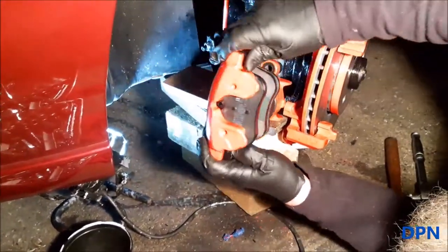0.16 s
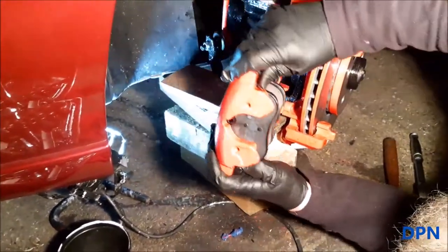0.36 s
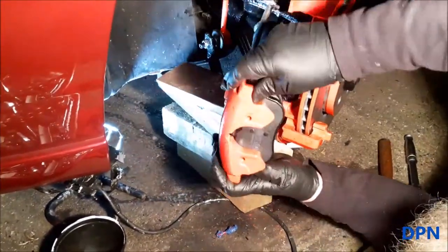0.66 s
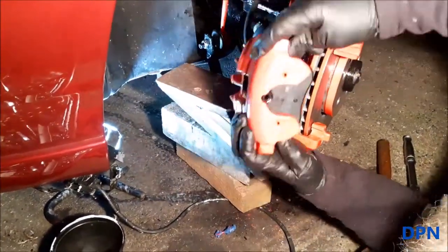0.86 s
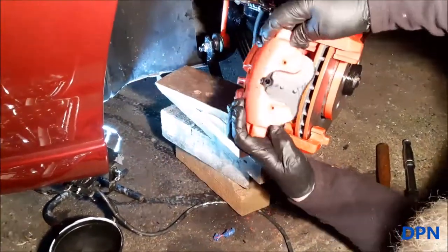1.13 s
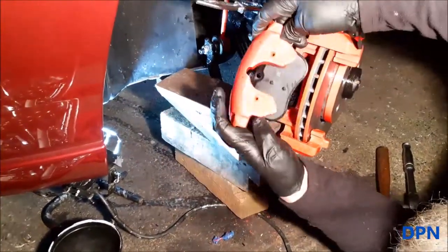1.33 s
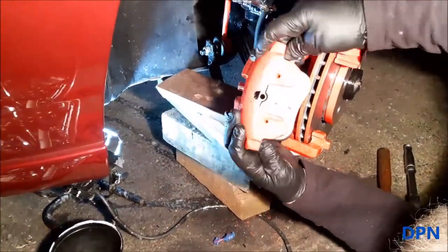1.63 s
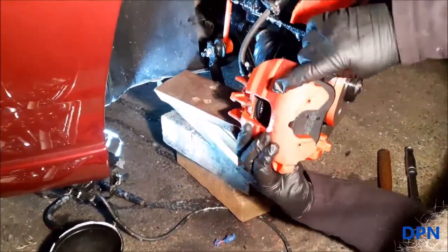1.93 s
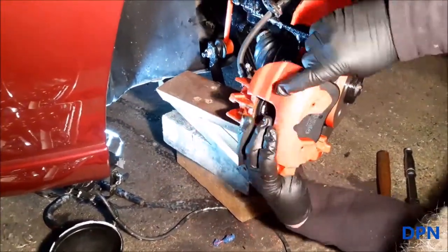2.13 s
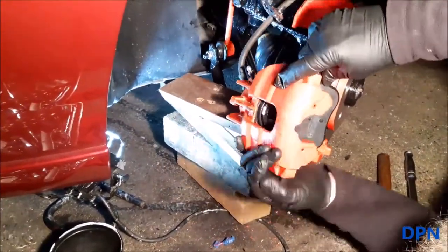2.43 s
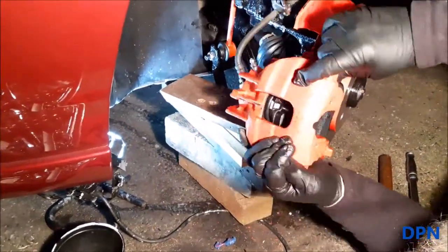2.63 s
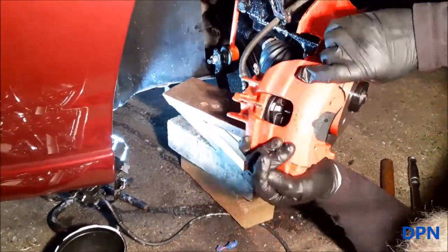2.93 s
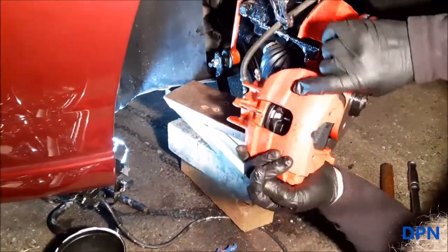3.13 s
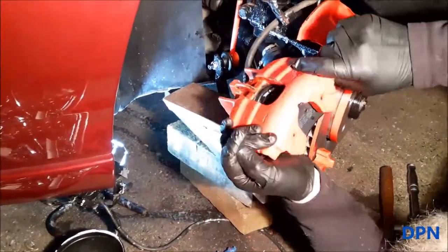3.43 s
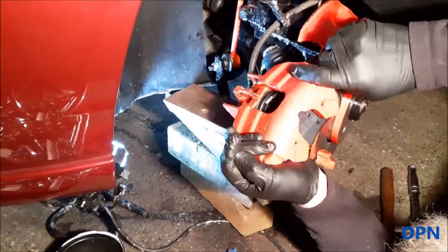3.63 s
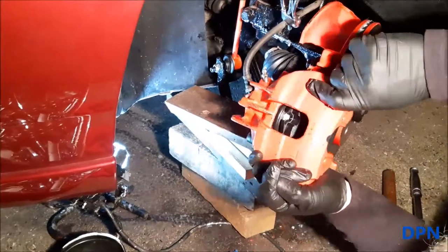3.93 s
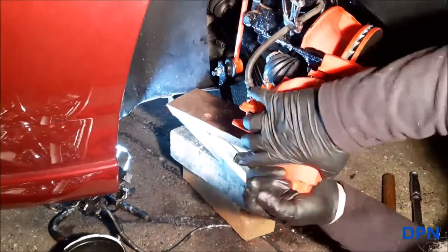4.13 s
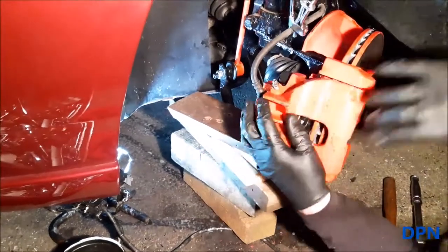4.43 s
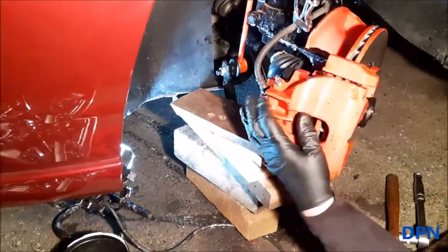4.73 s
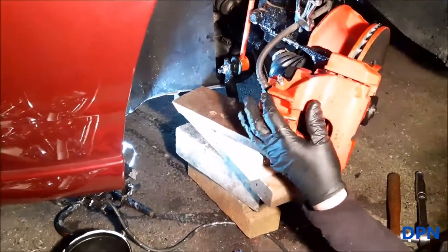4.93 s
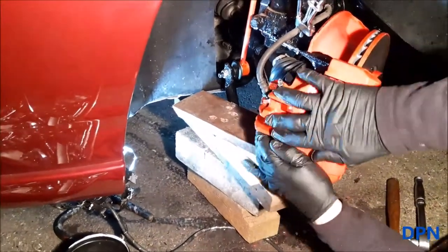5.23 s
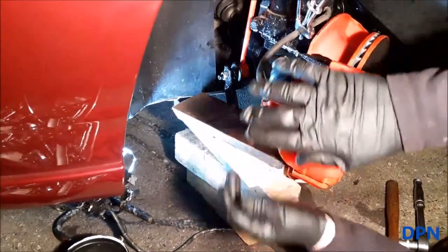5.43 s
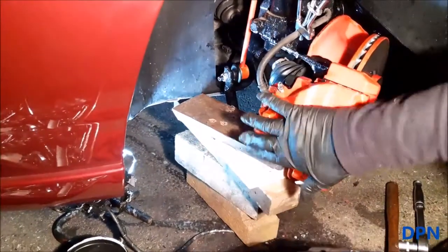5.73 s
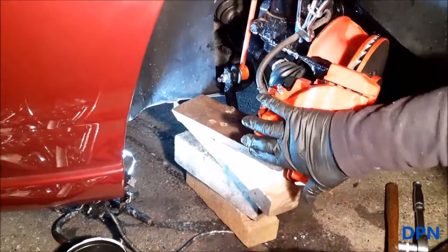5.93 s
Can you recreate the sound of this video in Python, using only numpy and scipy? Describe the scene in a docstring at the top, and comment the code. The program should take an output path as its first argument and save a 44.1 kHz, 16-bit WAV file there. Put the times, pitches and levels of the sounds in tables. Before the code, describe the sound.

In a quiet garage, gloved hands fit a brake caliper over a disc, heard close and in stereo. After a low, unsteady hum come speeded-up small ticks, a cluster of metal clacks around one second, scrapes and hollow knocks near one and a half, then sparse faint taps. Pads squeak softly past three seconds, two sharp clanks hit after four, rubs and clicks follow, and a heavier palm blow lands near the end.

```python
"""Metal parts of a brake caliper tick, knock and ring under gloved hands: noise bursts excite resonances.
Pads scrape on the disc as shaped friction noise, with squeaks and whistles as gliding tones and bands.
The hollow wheel arch hums low. The middle stretch is sped up, so its boom sits two octaves higher and its
echoes are short; a palm blow at normal speed follows, near the end. Quiet garage air lies beneath."""
import sys
import numpy as np
from scipy import signal
from scipy.io import wavfile
from scipy.ndimage import uniform_filter1d

SR = 44100
rng = np.random.default_rng(int(sys.argv[2]) if len(sys.argv) > 2 else 0)


def to_wav(sig):
    """Store sig (one row per channel, or 1-D mono) as 16-bit WAV at the path in sys.argv[1].

    Samples outside -1..1 are clipped; the rate is SR.
    """
    pcm = np.clip(np.atleast_2d(sig), -1, 1) * 32767
    pcm = np.round(pcm).astype(np.int16)
    wavfile.write(sys.argv[1], SR, pcm.T)  # frames by channels


N = 268111

# Spectrum of thud and boom, sped up. Each row: frequency in hertz, relative density in dB.
THUD = [(35, -80), (60, -45.5), (107, -46), (181, -13), (350, -7.5), (440, -6.5), (584, -7), (651, -9),
        (1190, -7.5), (1500, -16.5), (1950, -56.5), (3300, -120)]
# Spectrum of the body of the parts and of coarse scrape. Each row: frequency in hertz, relative density in dB.
BODY = [(150, -79.5), (500, -30.5), (900, -0.5), (1300, -1), (2200, 3.5), (3500, 3), (5000, -10.5),
        (8000, -41.5)]
# Spectrum of sharp edges and of fine hiss. Each row: frequency in hertz, relative density in dB.
EDGE = [(800, -74.5), (3000, -12), (4800, -2.5), (7000, 0), (10000, -5), (13000, -9), (16000, -6)]
# Left-right likeness of diffuse sound. Each row: frequency in hertz, likeness (1 is identical).
SAME = [(60, 0.87), (500, 0.84), (1500, 0.81), (3100, 0.15), (7000, 0)]


def gain_of(db):
    """Level law: decibels to amplitude."""
    return 10 ** (np.asarray(db) / 20)


def evened(x):
    """Power normalisation: scales to rms 1."""
    return x / np.sqrt(np.mean(x ** 2) + 1e-20)


def read(points, hz):
    """Interpolates a spectrum table linearly over log frequency."""
    f, value = np.transpose(points)
    return np.interp(np.log(hz + 1), np.log(f + 1), value)


def colour(points, peaks=()):
    """Minimum-phase filter of energy 1: the phase is the Hilbert transform of the log gain."""
    hz = abs(np.fft.fftfreq(8192, 1 / SR))
    gain = gain_of(read(points, hz))
    for f, width, db in peaks:
        resonance = 1 / (1 + (2 * (hz - f) / width) ** 2) ** 2
        gain = gain * (1 + gain_of(db) * resonance)
    log_gain = np.log(np.maximum(gain, 1e-5))
    phase = -signal.hilbert(log_gain).imag
    taps = np.fft.ifft(np.exp(log_gain + 1j * phase)).real[:4096]
    return taps / np.linalg.norm(taps)


def through(x, taps):
    """Linear filtering: convolves every channel with the taps."""
    return signal.oaconvolve(np.atleast_2d(x), np.atleast_2d(taps), axes=1)[:, :N]


def spread(left, other):
    """Partial coherence: makes a left-right pair of spectra as alike as the diffuse-field table asks."""
    hz = np.linspace(0, SR / 2, left.shape[0])
    same = np.clip(read(SAME, hz), -1, 1)[:, None]
    return np.array([left, same * left + np.sqrt(1 - same ** 2) * other])


def hiss(points, patchy_db, peaks=(), size=8):
    """Coloured Gaussian noise in two channels, its level drifting in time-frequency patches; rms 1."""
    frames = N // 128 + 5
    a, b, c, d, patches = rng.standard_normal((frames, 257, 5)).T
    patches = evened(uniform_filter1d(uniform_filter1d(patches, size, 0), size, 1))
    z = spread(a + 1j * b, c + 1j * d) * gain_of(patchy_db * patches)
    noise = signal.istft(z, nperseg=512, noverlap=384)[1][:, :N]
    return evened(through(noise, colour(points, peaks)))


def wobble(size, span):
    """Narrow-band random modulation: a smoothed complex noise of rms 1 roughens level and phase."""
    noise = rng.standard_normal((2, size))
    a, b = uniform_filter1d(uniform_filter1d(noise, span, mode="wrap"), span, mode="wrap")
    return (a + 1j * b) * np.sqrt(3 * span / 4)


def spin(hz, t):
    """Complex rotation at a steady frequency, the phasor of a pure tone."""
    return np.exp(2j * np.pi * hz * t)


def glide(path_hz):
    """Complex rotation whose phase is the running sum of its frequency."""
    return np.exp(2j * np.pi * np.cumsum(path_hz) / SR)


def tail(speed, start_s):
    """Reverberation: echoes of random sign decay per band; speed shortens them and shifts the bands."""
    # Decay of the garage at speed 1. Each row: frequency in hertz, time to fall 60 dB in seconds.
    garage = [(100, 0.34), (260, 0.23), (700, 0.22), (1840, 0.047), (4850, 0.04), (12800, 0.19)]
    size, first = SR // 2, round(start_s * SR)
    taps, slots = np.zeros((2, size)), np.arange(first, size - 16, 16)  # one echo per 16 samples
    places = slots + rng.integers(0, 16, (2, len(slots)))
    signs = rng.choice([-1., 1.], (2, len(slots)))
    np.put_along_axis(taps, places, signs, 1)
    hz, t, z = signal.stft(taps, SR, nperseg=256)
    decay = gain_of(-60 * speed * t / read(garage, hz / speed)[:, None])
    taps = signal.istft(spread(z[0], z[1]) * decay, SR, nperseg=256)[1]
    return taps / np.linalg.norm(taps[0])


def panels(x):
    """Early reflections: nearby panels comb-filter left and right differently."""
    taps = np.zeros((2, 64))
    taps[0, [1, 9, 31]] = 1, .35, -.25
    taps[1, [0, 14, 22]] = 1, -.25, .3
    return through(x, taps / np.linalg.norm(taps, axis=1, keepdims=True))


def burst(t60, rise_s, apart=0.):
    """Contact chatter: noise with a quick rise and exponential decay, partly different left and right."""
    t = np.arange(round(.2 * SR)) / SR
    shared, *own = rng.standard_normal((3, len(t)))
    noise = (shared + apart * np.array(own)) / np.sqrt(1 + apart ** 2)
    return noise * gain_of(-60 * t / max(t60, .004)) * (1 - np.exp(-t / rise_s))


def add(mix, s, sound):
    """Superposition: mixes a sound in at time s."""
    part = mix[..., round(s * SR):][..., :sound.shape[-1]]
    part += sound[..., :part.shape[-1]]


def air():
    """Background noise of garage air: coloured noise crossfades to a higher spectrum in the fast stretch."""
    # Air at normal speed, then sped up. Each row: frequency in hertz, relative density in dB.
    air_slow, air_fast = [(88, -55), (150, -8), (376, -11.5), (854, -18), (923, -18), (998, -20.5),
                          (1360, -18), (2400, -23), (6770, -27), (8560, -33.5), (12400, -28),
                          (16000, -29.5)], [(35, -56.5), (60, -28), (130, -24), (176, -8), (268, 0), (389, 0),
                                       (698, -18.5), (1170, -14.5), (1740, -21), (5460, -22), (6740, -28),
                                       (8510, -23.5), (16000, -36)]
    # Level at normal speed, lifted by fading echoes of earlier knocks. Each row: time in seconds, level in dB.
    air_level = [(0, -58.5), (.15, -68.5), (.4, -58), (5.4, -79.5), (5.74, -73), (5.9, -56.5), (6.08, -62)]
    fast_from_s, fast_to_s, fast_db = .422, 5.372, -68.5
    t = np.arange(N) / SR
    is_fast = uniform_filter1d(1. * (t > fast_from_s) * (t < fast_to_s), 400)
    slow = gain_of(np.interp(t, *np.transpose(air_level))) * hiss(air_slow, 1.8)
    fast = gain_of(fast_db) * gain_of([[-.6], [.6]]) * hiss(air_fast, 1.2)
    return is_fast * fast + (1 - is_fast) * slow


def arch():
    """Cavity resonance of the hollow wheel arch: a wavering low tone within a band of rumble."""
    # Hum in two parts, before and after the fast stretch.
    # Each row: time in seconds, level in dB, frequency in hertz.
    hum_parts = [
        [(0.0, -42, 100.3), (0.052, -39, 100.5), (0.088, -43, 104.8), (0.112, -40.5, 104), (0.142, -61, 105),
         (0.17, -49.5, 103), (0.198, -55, 105), (0.248, -65, 101), (0.304, -49.5, 110), (0.35, -42.5, 109),
         (0.372, -42.5, 107), (0.41, -54, 105), (0.42, -78, 106)],
        [(5.36, -76, 90), (5.67, -66, 61.8), (5.745, -74, 66.1), (5.775, -40, 123), (5.796, -26, 116),
         (5.81, -27, 113), (5.828, -36.5, 112), (5.856, -34, 112), (5.878, -49, 114.5), (5.9, -35.5, 119.2),
         (5.944, -34.5, 104), (5.984, -52.5, 93.4), (6.08, -51, 94.7)],
    ]
    # Spectrum of the rumble. Each row: frequency in hertz, relative density in dB.
    rumble_tone = [(15, -78.5), (25, -37), (59, -14.5), (102, -7), (147, -13.5), (178, -13.5), (413, -23.5),
                   (549, -22), (677, -37), (775, -34), (900, -35.5), (1170, -77)]
    waver, rumble_db = .27, -7  # unsteadiness of the hum; rumble relative to the hum
    t, level, hum = np.arange(N) / SR, np.zeros(N), np.zeros(N)
    for rows in hum_parts:
        s, db, hz = np.transpose(rows)
        part = uniform_filter1d(gain_of(np.interp(t, s, db, -120, -120)), 200)
        turn = glide(np.interp(t, s, hz)) * np.exp(2j * np.pi * rng.random())
        level = level + part
        hum = hum + np.sqrt(2) * part * (turn * (1 + waver * wobble(N, 700))).real
    return hum + gain_of(rumble_db) * level * hiss(rumble_tone, 2.4)


def whistles():
    """Narrow-band friction noise: random modulation widens a gliding tone as pads whistle on the steel."""
    # Each row: start and end in seconds, start and end frequency in hertz, level in dB.
    # A row that ends before it starts is silent.
    whistle_rows = [(3.274, 3.335, 1150, 1150, -54), (4.85, 4.96, 3700, 3900, -63),
                    (4.85, 4.95, 2450, 2900, -57), (3.26, 3.338, 8600, 8300, -53.5),
                    (3.35, 3.47, 7100, 7530, -50), (3.324, 3.46, 5500, 5900, -65),
                    (2.934, 3.005, 5500, 5500, -72), (3.082, 2.9, 2257, 2195, -67),
                    (3.1, 3.19, 5650, 5400, -70.5), (3.658, 3.76, 2000, 2500, -66),
                    (3.899, 4.017, 2900, 3500, -57), (3.609, 3.806, 5720, 5610, -64.5),
                    (3.92, 4.082, 7400, 7300, -55), (4.397, 4.54, 7470, 7200, -46),
                    (4.703, 4.781, 9600, 9300, -51.5), (4.72, 4.782, 7240, 6908, -61),
                    (4.853, 5.01, 7140, 7500, -51), (5.25, 5.31, 7320, 7000, -46.5)]
    out = np.zeros(N)
    for start_s, end_s, start_hz, end_hz, db in whistle_rows:
        u = np.arange(0, 1, 1 / (SR * (end_s - start_s)))
        turn = glide(start_hz + (end_hz - start_hz) * u)
        envelope = np.sin(np.pi * u ** 0.94) ** 0.56
        add(out, start_s, gain_of(db) * envelope * (turn * wobble(len(u), 55)).real)
    return panels(out)


def squeaks():
    """Friction tones as the pads catch on the disc: slightly rough oscillations that fall in pitch."""
    # Each row: start and end in seconds, start and end frequency in hertz, level in dB.
    squeak_rows = [(3.436, 3.449, 2330, 1910, -44), (3.447, 3.465, 1296, 1290, -43.5),
                   (3.443, 3.482, 734, 620, -46.5), (3.49, 3.533, 566, 392, -37),
                   (3.496, 3.54, 1260, 1156, -51.5)]
    out = np.zeros(N)
    for start_s, end_s, start_hz, end_hz, db in squeak_rows:
        u = np.arange(0, 1, 1 / (SR * (end_s - start_s)))
        turn = glide(end_hz + (start_hz - end_hz) * (1 - u) ** 2)
        envelope = np.sin(np.pi * u ** 0.74)
        add(out, start_s, gain_of(db) * envelope * (turn * (1 + 0.38 * wobble(len(u), 150))).real)
    return panels(out)


def slips():
    """Irregular friction: slow uneven slips plus decaying ticks of grit caught under the pads."""
    grains_per_s, grain_spread_db, grain_db, grain_decay_s = 350, 3.5, -9, 0.0033
    uneven = evened(gain_of(1.8 * evened(uniform_filter1d(rng.standard_normal(N), 150))))
    strengths = gain_of(grain_spread_db * np.minimum(rng.exponential(1, N), 2.5))
    ticks = strengths * (rng.random(N) < grains_per_s / SR)
    grains = evened(signal.lfilter([1], [1, -np.exp(-1 / (grain_decay_s * SR))], ticks))
    return evened(uneven + gain_of(grain_db) * grains)


def sliding():
    """Friction noise: hiss and scrape follow the stroke and partly excite the steel; the arch booms along."""
    # Strokes of pads and gloves. Each row: start, fastest moment and end in seconds (put in order below),
    # levels of fine hiss, coarse scrape and boom in dB, share of power in singing steel (0-1).
    strokes = [(0.322, 0.334, 0.54, -85, -56.5, -44.5, 0.4), (0.363, 0.456, 0.5, -57, -54.5, -62, 0.1),
               (0.843, 0.921, 0.97, -69, -65, -66.5, 0.23), (1.11, 1.154, 1.17, -82, -63, -52, 0.2),
               (1.17, 1.259, 1.46, -66, -52, -39, 0.37), (1.24, 1.374, 1.444, -56, -47.5, -37.5, 0.16),
               (1.385, 1.452, 1.543, -48, -40.5, -26.5, 0.37), (1.989, 2.01, 2.025, -62, -56.5, -60, 0.15),
               (2.35, 2.38, 2.45, -70, -61, -60, .1), (2.484, 2.522, 2.525, -56.5, -62.5, -72, 0.12),
               (2.617, 2.636, 2.623, -60, -51.5, -60, 0.04), (2.923, 2.966, 2.98, -64, -71.5, -68, 0.57),
               (3.086, 3.139, 3.22, -70.5, -63, -90, 0.75), (3.265, 3.304, 3.37, -53.5, -49.5, -55, 0),
               (3.3, 3.439, 3.55, -49.5, -52.5, -67, 0.71), (3.438, 3.514, 3.526, -53.5, -56, -48.5, 0.1),
               (3.62, 3.626, 3.73, -64.5, -63, -61, 1), (3.653, 3.714, 3.85, -62, -58.5, -77, .7),
               (3.78, 3.884, 3.94, -65.5, -66.5, -75, 0), (3.901, 3.978, 3.99, -50.5, -52, -54.5, 0.23),
               (3.977, 4.065, 4.14, -53, -62, -76, 0), (4.318, 4.334, 4.384, -44, -36, -40, 0.2),
               (4.382, 4.419, 4.565, -39, -43.5, -51.5, 0.05), (4.495, 4.544, 4.58, -60, -62, -67, 0),
               (4.596, 4.609, 4.68, -57.5, -56.5, -60.5, 0.04),
               (4.674, 4.733, 4.83, -47.5, -52, -56.5, 0.02), (4.802, 4.813, 4.84, -49.5, -51, -51.5, 0.4),
               (4.83, 4.878, 5.11, -47.5, -54, -62.5, 0.15), (5.022, 5.026, 5.2, -54.5, -58.5, -64, 0),
               (5.1, 5.14, 5.26, -60.5, -61, -58.5, 0.13), (5.173, 5.217, 5.225, -55, -45.5, -43.5, 0.26),
               (5.243, 5.277, 5.316, -44, -48.5, -49, 0.04), (5.397, 5.42, 5.54, -67.5, -95, -92, 0.35)]
    # Resonances of steel rubbed by the pads. Each row: frequency in hertz, width in hertz, lift in dB.
    sing = [(1210, 160, 12), (2200, 700, 20), (5700, 900, 18), (7300, 700, 20), (8500, 250, 10)]
    # Duller hiss under the singing. Each row: frequency in hertz, relative density in dB.
    sung_tone = [(800, -61), (3000, -19.5), (4800, -2.5), (8000, -0.5), (11000, -6), (16000, -7)]
    sets_in_db, ends_db = -14, -22.5  # a stroke swells to its fastest point and fades
    touch_s, release_s = .014, 0.026  # it dies away more slowly than it sets in
    boom_steepness = 1.26  # the boom follows the stroke more steeply
    t, power = np.arange(N) / SR, np.zeros((5, N))
    for start, top, end, fine_db, coarse_db, boom_db, share in strokes:
        at = slice(max(round((start - touch_s) * SR), 0), round((end + release_s) * SR))
        share = np.clip(share, 0, 1)
        on = np.clip(np.minimum((t[at] - start) / touch_s, (end - t[at]) / release_s) + .5, 0, 1)
        db = np.interp(t[at], np.sort((start, top, end)), (sets_in_db, 0, ends_db))
        levels_db = [fine_db + db, coarse_db + db, boom_db + boom_steepness * db]
        fine, coarse, boom = (on * gain_of(levels_db)) ** 2
        power[:, at] += (1 - share) * fine, share * fine, (1 - share) * coarse, share * coarse, boom
    fine, fine_sung, coarse, coarse_sung, boom = np.sqrt(power)
    fine = fine * hiss(EDGE, 3., size=14) + fine_sung * hiss(sung_tone, 2.5, sing, size=20)
    coarse = coarse * hiss(BODY, 1.8) + coarse_sung * hiss(BODY, 2.5, sing, size=20)
    boom = boom * hiss(THUD, 2.)
    return gain_of([[-1.1], [1.1]]) * slips() * (fine + coarse + boom)


def palm():
    """Impact and modal response: the palm slaps the caliper home, the iron rings and the garage answers."""
    # The blow and its bounces. Each row: time in seconds, level in dB, thud and sharp edge relative
    # to it in dB, time to fall 60 dB in seconds (stretched below for the thud).
    blows = [(5.759, -22.5, -7, -1.5, 0.12), (5.769, -3.5, -16, -21, 0.068),
             (5.778, -12, -8.5, -26.5, 0.056), (5.788, -16, -10.5, -32, 0.051), (5.799, -26, -2, -40, 0.15),
             (5.824, -34, 9, -37, 0.05)]
    # Modes of caliper and hub. Each row: frequency in hertz, relative level in dB, time to fall 60 dB in seconds.
    hub = [(201, 3, 0.24), (438, -8.5, 0.37), (306.3, 2, 0.37), (372, 7, 0.2), (779, 7, 0.28),
           (593, 2, 0.23), (870, -6.5, .14), (949, -2, 0.23), (1280, -1.5, 0.14), (1400, -10, 0.53),
           (1780, -26, .5), (2000, -17.5, .15), (2115, 0, 0.16)]
    swell_cycles = 3  # a mode of the iron builds up over these cycles
    thud, body, edge = np.zeros((3, 2, N))
    for s, db, thud_db, edge_db, t60 in blows:
        add(thud, s, gain_of(db + thud_db) * burst(1.56 * t60, 0.0026))
        add(body, s, gain_of(db) * burst(t60, 0.0045, 0.84))
        add(edge, s, gain_of(db + edge_db) * burst(t60, .002, 1.0))
    t = np.arange(SR // 3) / SR
    iron = np.zeros(len(t))
    for hz, db, t60 in hub:
        envelope = gain_of(db - 60 * t / t60) * (1 - np.exp(-t * hz / swell_cycles))
        iron += envelope * (spin(hz, t) * (.9 + .45 * wobble(len(t), 600))).imag
    # Spectra of thud, body and edge. Each row: frequency in hertz, relative density in dB.
    low = [(30, -60.5), (80, -16.5), (150, 5.0), (370, 2), (800, -10.5), (1300, -44.5), (3000, -76.0)]
    dull = [(100, -83), (500, -8), (900, -1.0), (1300, 0), (2000, -8), (3400, -8.5), (5000, -30.0),
            (9000, -59.0)]
    crisp = [(1000, -64), (3500, -31), (5000, -1.0), (8000, -4.5), (10000, -13.5), (12000, -2), (16000, -7)]
    dry = through(thud, colour(low)) + through(body, colour(dull)) + through(edge, colour(crisp))
    ringing = gain_of(-11.0) * through(body + thud, iron / np.linalg.norm(iron))
    dry = panels(dry + ringing) * gain_of([[-1.6], [1.6]])
    near = gain_of(-9.5) * tail(0.92, 0.0045)
    far = gain_of(-27) * tail(0.33, 0.04)  # the far walls answer later and longer
    return dry + through(dry.mean(0), near + far)


def knocks():
    """Impact excitation: each contact drives a thud, the body of the parts, a sharp edge and ringing modes."""
    # Each row: time in seconds, level in dB, thud and sharp edge relative to it in dB,
    # strongest ring in hertz, its share (0-1), time to fall 60 dB in seconds (scaled below for thud and edge).
    knock_rows = [(.3245, -32, -12, -26, 900, .6, .015), (.331, -43.5, -2, -32, 1413, 0.98, 0.22),
                  (.417, -44, 17, -8, 1090, 0, 0.014), (.539, -53.5, 20, -16, 1350, 0.3, 0.023),
                  (.563, -29.5, -10, -4, 11300, 0.55, 0.016), (.588, -55.5, 23.5, -7, 1060, 0.4, 0.014),
                  (.62, -54.5, -19, 2, 11200, 0.4, 0.021), (.647, -60, 18.5, -24, 1120, 0.4, 0.03),
                  (.664, -59, -10, -18, 2190, 0.7, .03), (.708, -62, 2, -15, 2200, .6, .04),
                  (.744, -58, 6, -6, 2570, 0.6, 0.1), (.795, -52.5, 10.5, 6.5, 10100, 0.5, 0.035),
                  (.958, -23.5, -19, -15.5, 3680, 0.65, .03), (.959, -21.5, -7.5, -22, 2334, 0.46, .06),
                  (.971, -27.5, -6, -27, 1450, 0.7, 0.025), (.995, -38, -21, -24, 3600, 0.7, .02),
                  (.998, -28, -5, -30, 1500, 0.7, 0.058), (1.027, -35, -11, -23, 2326, 0.77, 0.036),
                  (1.084, -55, -12, -12, 1010, 0.6, 0.065), (1.127, -48.5, 2.5, -27, 1090, 0.57, 0.052),
                  (1.19, -41, 4.5, -25, 2190, 0.63, 0.042), (1.225, -28, -0.5, -24, 1257, 0.67, 0.065),
                  (1.394, -34.5, -8, 0.5, 2330, 1, .017), (1.433, -31, 2, -20.5, 1200, 0.4, 0.033),
                  (1.443, -23, 8, -17, 1006, 0.77, 0.057), (1.453, -25, 7, -19.5, 1200, 0.52, 0.063),
                  (1.488, -32, 8, -25, 1000, .6, 0.049), (1.517, -45.5, 6.5, -7.5, 517, 0.95, 0.15),
                  (1.639, -31.5, -6.5, -28.5, 2210, 0.78, 0.044), (1.742, -49, 7, -19, 1130, 0.52, 0.051),
                  (1.869, -56, -10, -13, 1087, 0.62, 0.16), (1.94, -55, -7, -13, 1220, 0.57, 0.071),
                  (2.014, -41.5, -0.5, -17, 1355, 0.57, 0.041), (2.05, -41.5, -2.5, -23, 1166, 0.02, 0.013),
                  (2.094, -65, 7, 0.5, 8500, 0.74, 0.044), (2.364, -51.5, 5, -17, 1100, 0.7, 0.071),
                  (2.43, -65.5, 19, -15, 1130, 0.6, 0.031), (2.535, -54.5, 9.5, -14, 1150, 0.1, 0.039),
                  (2.633, -49.5, 5.5, -4, 8500, 0.02, 0.044), (2.719, -60.5, -5, 5, 8500, 0.62, 0.038),
                  (2.802, -68, -1.5, 4.5, 8470, 0.5, 0.035), (3.272, -47, -9, -5, 1110, 0.7, .1),
                  (3.422, -45, -9, -15, 1200, 0.8, .02), (3.439, -44, -8.5, -14, 1223, 1, 0.14),
                  (3.494, -45, 10, -8, 1180, 1, 0.022), (3.555, -57, -20, -12, 8400, 0.8, 0.037),
                  (3.561, -40.5, -6.5, -28, 1170, 0.83, 0.019), (3.782, -47, 2.5, -5, 1170, 0.32, 0.031),
                  (3.878, -54.5, -11, -4, 2690, 0.47, 0.033), (4.108, -56, 16, -30, 1140, 1, 0.028),
                  (4.201, -50, 1.5, -5, 11070, 0.81, 0.052), (4.239, -22, -32.5, -7.5, 4910, 0.52, .02),
                  (4.249, -21, -11.5, 8, 5040, 0.2, 0.018), (4.257, -24, -15, -3, 3930, 0.25, 0.046),
                  (4.2635, -10.5, -12, -6, 2260, 0.24, 0.051), (4.286, -25, -12, -8, 4870, 0.25, .04),
                  (4.305, -26, -20, -8, 2500, 0.2, .03), (4.309, -6, -18.5, -4, 3440, 0.43, 0.034),
                  (4.321, -9.5, -18.5, -1, 6520, 0.4, 0.046), (4.391, -24.5, -8, -36, 1135, 0.64, 0.041),
                  (4.464, -34.5, -6.5, -19, 1600, 0.7, 0.024), (4.598, -47, -8, -2, 8300, 0.8, 0.028),
                  (4.648, -35.5, -10, -10, 3740, 0.36, 0.072), (4.658, -27, -3.5, -18, 1232, 0.77, 0.043),
                  (4.672, -16.5, -26, -17, 7100, 0.74, 0.028), (4.817, -31, -15.5, -15.5, 2710, 0.56, 0.03),
                  (5.028, -48, 2.5, -20, 2400, 0.7, 0.027), (5.038, -40.5, -17, -24, 2460, 0.7, 0.038),
                  (5.075, -28.5, -37, -20.5, 3720, 0.68, 0.016), (5.124, -60.5, 15, -15, 1200, .4, 0.057),
                  (5.161, -58.5, 12, -13, 1201, .4, .03), (5.167, -41.5, -8, -19, 1181, 0.47, 0.025),
                  (5.205, -36, -20, -11, 3500, .3, 0.013), (5.208, -33.5, 3, -25, 1140, 0.55, 0.031),
                  (5.219, -25, -10.5, -9, 1330, 0.53, 0.038), (5.283, -31.5, -11, -9.5, 1910, 0.43, 0.026),
                  (5.377, -67.5, -7, 7, 11920, 0.6, 0.073)]
    # Resonances of struck parts, sped up. Each row: frequency in hertz, width in hertz, lift in dB.
    steel = [(1560, 120, -18), (2170, 200, -4.5), (3370, 140, -3.5), (3980, 71, -1.5), (5500, 210, 3),
             (6640, 83, -6), (6990, 360, 2), (9000, 430, 6), (9365, 190, 5.5), (9900, 120, 6),
             (12200, 400, -1), (12500, 400, 6)]
    # Deep shake under thuds. Each row: frequency in hertz, relative density in dB.
    jolt = [(25, -24), (60, -19), (110, -8), (170, 1), (260, -8), (450, -49)]
    thud_note_hz, thud_spread = 432.7, 0.076  # the arch's note and its relative scatter
    lean_db, lean_spread_db = -2, 1  # left minus right and its scatter
    tick_db, tick_t60 = 5, 0.013  # the first touch is a short bright tick
    thud, body, edge, ring = np.zeros((4, 2, N))
    t = np.arange(round(.2 * SR)) / SR
    scatter = rng.standard_normal((len(knock_rows), 2))
    for (s, db, thud_db, edge_db, hz, share, t60), (a, b) in zip(knock_rows, scatter):
        thud_hz, pan_db = thud_note_hz * (1 + thud_spread * a), lean_db + lean_spread_db * b
        side, share = gain_of(db + pan_db * np.array([[.5], [-.5]])), np.clip(share, 0, 1)
        thud_gain = side.mean() * gain_of(thud_db - 6.5)
        swell = t / (0.21 * t60) * np.exp(1 - t / (0.17 * t60))  # the hollow arch builds up slowly
        add(ring, s, thud_gain * swell * (spin(thud_hz, t) * wobble(len(t), 150)).imag)
        add(thud, s, thud_gain * burst(1.34 * t60, 0.0075))
        add(body, s, side * (1 - share) * burst(t60, 0.0015, 0.92))
        tick = gain_of(tick_db) * burst(tick_t60, 0.00053, 0.24)
        add(edge, s, side * gain_of(edge_db) * (burst(0.85 * t60, 0.0022, 0.26) + tick))
        tone = (spin(hz, t) * (.8 + 0.6 * wobble(len(t), 55))).imag
        envelope = gain_of(-60 * t / t60) * (1 - np.exp(-t / 0.0006))
        add(ring, s, side * share * 0.82 * tone * envelope)
    dry = through(thud, colour(THUD)) + through(body, colour(BODY, steel))
    dry = dry + through(edge, colour(EDGE, steel))
    no_deep_bass = [(90, -61.5), (220, 1.0), (16000, 3.0)]  # each row: hertz, relative dB
    dry = panels(dry + through(ring, colour(no_deep_bass)))
    dry = dry + gain_of(-21.0) * through(thud, colour(jolt))
    return dry + gain_of(-5) * through(dry.mean(0), tail(1.97, .0015))


def scene():
    """Superposition of all sources."""
    return air() + arch() + whistles() + squeaks() + sliding() + palm() + knocks()


def record(dry):
    """Band limit: a linear-phase low-pass at 16.1 kHz."""
    taps = signal.firwin(511, 16100, window=("kaiser", 9), fs=SR)
    return signal.oaconvolve(dry, taps[None], "same")


dry = scene()
out = record(dry)
to_wav(out)
```